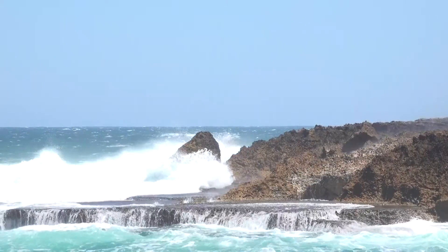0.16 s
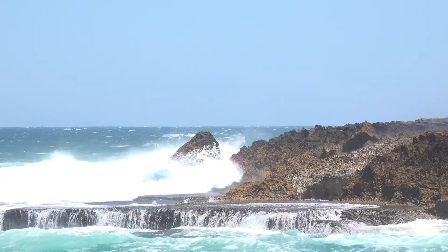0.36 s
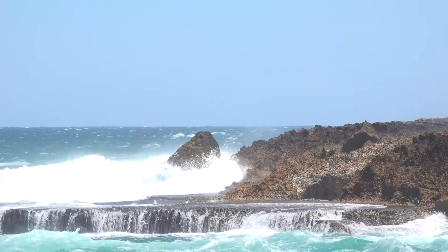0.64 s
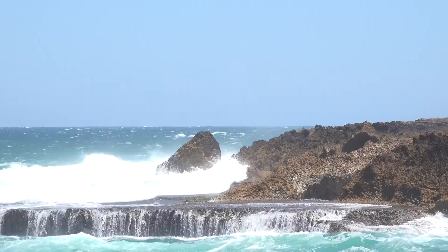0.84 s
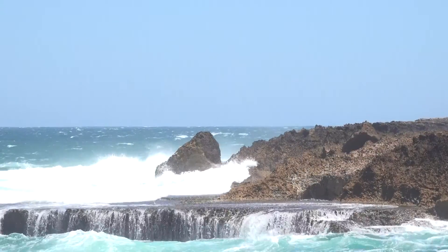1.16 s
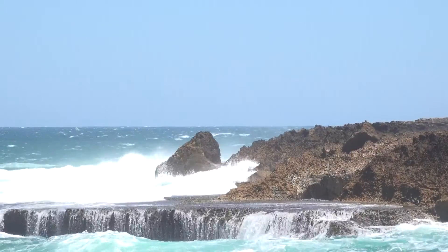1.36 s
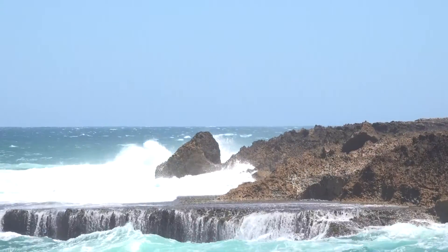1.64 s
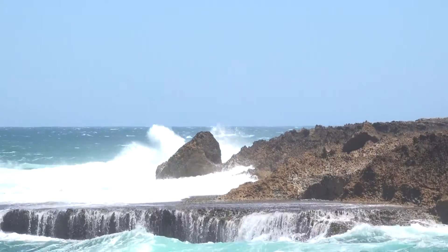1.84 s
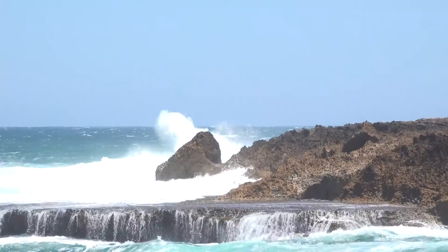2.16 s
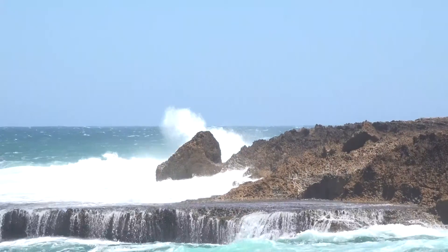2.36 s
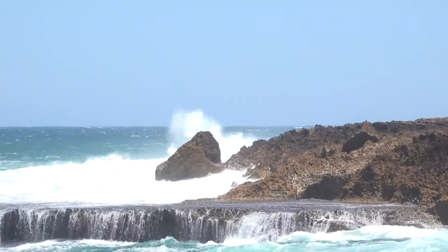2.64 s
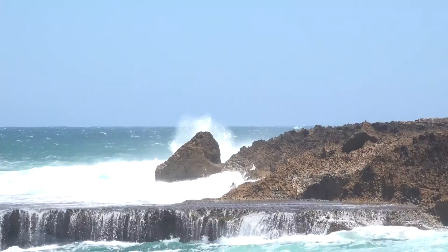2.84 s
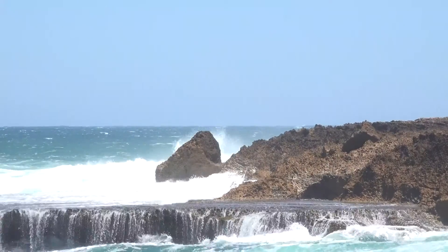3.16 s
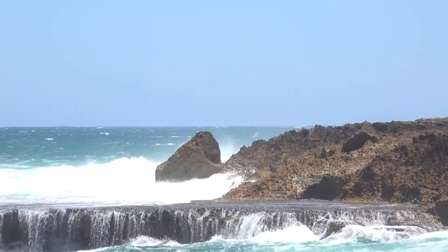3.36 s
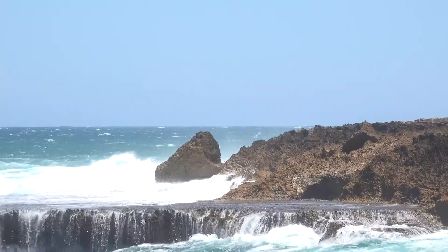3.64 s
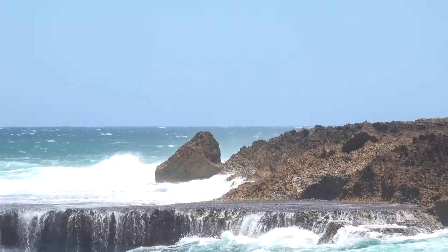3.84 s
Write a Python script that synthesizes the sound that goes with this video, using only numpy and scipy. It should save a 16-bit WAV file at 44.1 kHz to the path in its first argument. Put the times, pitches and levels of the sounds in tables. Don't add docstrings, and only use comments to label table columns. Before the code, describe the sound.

Steady roar of breaking surf with foamy hiss, buffeted by low, thudding wind on the microphone

```python
import sys
import numpy as np
from scipy import signal
from scipy.fft import rfft, irfft
from scipy.io import wavfile
from scipy.ndimage import uniform_filter1d, minimum_filter1d

SR = 44100
rng = np.random.default_rng(int(sys.argv[2]) if len(sys.argv) > 2 else 0)


def field_ratio(decibels):
    return 10 ** (np.asarray(decibels, dtype=float) / 20)


def output_pcm(signal):
    pcm = np.clip(np.atleast_2d(signal).T, -1, 1) * 32767
    wavfile.write(sys.argv[1], SR, np.round(pcm).astype(np.int16))


N = 176400

# time in seconds, level in dB, brightness in dB per octave.
SURF_SWELL = [(0, -38.5, -0.5), (.2, -39, -2), (.45, -39, 0), (.7, -40.5, -1), (.93, -41, -1),
              (1.2, -40.5, -1), (1.5, -40.5, -1.5), (1.75, -42.5, -1), (2.0, -45.5, -.5), (2.2, -43, -.5),
              (2.38, -42, -1.5), (2.6, -44, -1), (2.9, -42.5, -1), (3.1, -41.5, -1.5), (3.3, -43, -1.5),
              (3.45, -42.5, -1.5), (3.7, -43, -2), (4, -43, -1)]
# frequency in Hz, density in dB per Hz.
SURF_SPECTRUM = [(25, 0.5), (70, -0.5), (300, -4), (900, -11), (2000, -13.5), (5200, -21), (9300, -37.5),
                 (14000, -40.5)]
# frequency in Hz, left minus right in dB.
SURF_BALANCE = [(60, 2), (200, 6), (600, 9.5), (1300, 7), (2500, 4.5), (5000, 4.5), (7400, -0.5),
                (13600, 3)]
# frequency in Hz, likeness from 0 to 1.
SURF_LIKENESS = [(60, 1), (600, 1), (2900, 0.99), (5600, 1), (6000, .5), (9000, 0.43), (12000, 0.46),
                 (14000, 0.75)]
# frequency in Hz, lead of the left port in radians.
PORT_LEAD = [(5600, 0), (5900, 1.0), (7200, 1.8), (8600, 3.1), (9700, 4.1), (11100, 4.6), (12400, 5.9),
             (13800, 6.3)]
# centre in Hz, width in Hz, lift in dB.
PORT_RESONANCES = [
    (1900, 300, 0.5),
    (2650, 830, -2.5),
    (6840, 1500, -1),
    (8060, 1140, 3.5),
]
# middle in seconds, length in seconds, lift in dB.
SPRAY_BURSTS = [
    (0.087, 0.12, 3),
    (.235, 0.078, 7),
    (0.526, .12, 2),
    (.7, 0.26, 5),
    (1.38, 0.23, 3),
    (1.55, .08, 2.5),
    (2.33, .06, 2),
    (3.056, .06, 2),
    (3.38, .06, 2.5),
]
# time in seconds, peak in dB.
BODY_TICKS = [
    (.055, -44),
    (.49, -45),
    (1.545, -40),
    (2.10, -49),
    (2.43, -49),
    (3.06, -46),
]
# start in seconds, length in seconds, strength in dB, eddy size as Hz.
WIND_PUFFS = [(.14, 0.075, -30.5, 70.5), (0.221, 0.077, -16.5, 53), (0.332, .12, -21.5, 58),
              (.44, .10, -31.5, 45), (0.582, 0.057, -23.5, 65), (0.638, 0.097, -22.5, 58),
              (0.769, 0.085, -25.5, 61), (0.856, 0.025, -20.5, 60.6), (1.249, 0.047, -35.5, 80),
              (1.311, 0.11, -34, 75.6), (1.441, .11, -20.5, 55.4), (1.539, 0.11, -22, 86),
              (1.66, 0.12, -15.5, 65), (1.804, .09, -18.5, 76), (1.889, 0.069, -23, 82),
              (1.988, .21, -33.5, 45), (2.303, 0.12, -18.5, 89), (2.417, 0.16, -20.5, 73),
              (2.558, 0.075, -27.5, 69), (2.659, 0.15, -24.5, 61.6), (2.847, 0.11, -25, 55.6),
              (3.04, .09, -20.5, 61), (3.119, 0.16, -19.5, 92.5), (3.297, 0.095, -27, 94),
              (3.38, 0.097, -19, 49), (3.459, 0.072, -18.5, 70), (3.542, 0.099, -28.5, 55.7),
              (3.701, 0.13, -23.5, 99), (3.839, 0.13, -24, 69), (3.95, .08, -26.5, 99)]
# time in seconds, peak in dB, size as Hz.
EDDY_SLAPS = [(.283, -9.5, 131), (0.353, -13, 71), (0.669, -10, 68), (.73, -19.5, 91), (0.884, -16, 70.4),
              (1.272, -20, 94), (1.385, -19, 122), (1.58, -12.5, 118), (1.685, -18.5, 297),
              (1.713, -13, 49.5), (1.82, -17, 128), (1.945, -10.5, 105), (2.266, -23, 55),
              (2.387, -13.5, 169), (2.537, -11.5, 108), (2.809, -20, 90), (2.875, -15, 60),
              (3.192, -12, 116), (3.269, -15, 140), (3.377, -15, 196), (3.403, -11, 54.7), (3.517, -8, 91),
              (3.818, -11, 116), (3.997, -12, 129)]
# frequency in Hz, left minus right in dB.
WIND_BALANCE = [(25, 8), (55, 0.5), (125, 9.5), (300, 17), (1000, 6)]
# frequency in Hz, likeness from 0 to 1.
WIND_LIKENESS = [(40, .998), (80, 1), (140, 0.82), (300, 1)]
# time in seconds, depth in dB.
GAIN_DUCKS = [
    (.285, 2),
    (.885, 0.5),
    (1.70, 4),
    (1.95, -0.5),
    (3.52, 3),
]


def evened(x):
    return x / np.sqrt(np.mean(x ** 2) + 1e-20)


def read(points, hz):
    f, value = np.transpose(points)
    return np.interp(np.log(hz + 1), np.log(f + 1), value)


def ports(sound, twin, balance, likeness):
    hz = np.fft.rfftfreq(N, 1 / SR)
    shared = np.clip(read(likeness, hz), 0, 1)
    right_gain = field_ratio(-read(balance, hz))
    turn = np.exp(-1j * read(PORT_LEAD, hz))
    left = rfft(sound)
    right = right_gain * (shared * turn * left + np.sqrt(1 - shared ** 2) * rfft(twin))
    mid = 0.5 * np.sqrt(abs(1 + right_gain * shared * turn) ** 2 + right_gain ** 2 * (1 - shared ** 2))
    return irfft(np.array([left, right]) / mid, N)


def foam():
    pitches, grains_per_s, spread_db = 24, 3000, 4
    t = np.arange(400) / SR
    out = np.zeros(N)
    for hz in np.geomspace(300, 13000, num=pitches):
        size = field_ratio(spread_db * np.minimum(rng.exponential(1, N), 5))
        bursts = size * (rng.random(N) < grains_per_s / pitches / SR)
        ring = np.sin(2 * np.pi * hz * t * (1 + 8 * t))
        grain = ring * t * hz * np.exp(-t * hz / 1.6)
        out += evened(signal.oaconvolve(bursts, grain)[:N]) * np.sqrt(hz)
    return evened(out)


def breakers():
    foam_db, roar_db, patch_db, flicker_db, spray_from_hz = -11, -1, 0.97, 0.23, 5200
    raw = rng.standard_normal(N) + field_ratio(foam_db) * foam()
    hz, t, z = signal.stft(raw, SR, nperseg=1024, noverlap=768)
    column = hz[:, None]
    patches = uniform_filter1d(rng.standard_normal(z.shape), size=14, axis=0)
    patches = evened(uniform_filter1d(patches, size=12, axis=1))
    flicker = evened(uniform_filter1d(rng.standard_normal(len(t)), size=4))

    s, level, bright = np.transpose(SURF_SWELL)
    db = read(SURF_SPECTRUM, hz)[:, None] + np.interp(t, s, bright) * np.log2((column + 50) / 2000)
    db += patch_db * patches + flicker_db * flicker
    for mid_hz, width_hz, lift_db in PORT_RESONANCES:
        db += lift_db * np.exp(-((column - mid_hz) / width_hz) ** 2)
    spray_db = sum(lift * np.exp(-(2 * (t - at) / length) ** 2) for at, length, lift in SPRAY_BURSTS)
    db += spray_db / (1 + (spray_from_hz / (column + 1)) ** 2.8)

    band = (hz > 700) & (hz < 5000)
    unit = np.sqrt(np.sum(field_ratio(2 * read(SURF_SPECTRUM, hz[band]))) / len(hz))
    gain = field_ratio(db + np.interp(t, s, level) + roar_db) / unit
    return signal.istft(z * gain, nperseg=1024, noverlap=768)[1][:N]


def ticks():
    ring_hz, t60_s = 10500, 0.006
    t = np.arange(600) / SR
    out = np.zeros(N)
    ring = np.sin(2 * np.pi * ring_hz * t) + 0.7 * np.sin(2 * np.pi * 0.79 * ring_hz * t)
    for s, db in BODY_TICKS:
        out[round(s * SR):][:len(t)] += field_ratio(db - 60 * t / t60_s) * ring
    return out * np.array([[1], [-0.3]])


def puff(start, length, db, eddy_hz):
    edge_s, eddies_per_s, spread_db, eddy_width = 0.025, 450, 2.0, 0.96
    rush_db, rush_hz, rush_tilt, port_cut_hz, steadiness = -21, 204, 2.11, 20.7, 0.4
    t = np.arange(SR // 3) / SR
    push = field_ratio(spread_db * rng.exponential(1, len(t))) * rng.standard_normal(len(t))
    push *= rng.random(len(t)) < eddies_per_s / SR
    to_edge = np.minimum(t, length - t + edge_s)
    shape = np.sin(np.pi / 2 * np.clip(to_edge / edge_s, 0, 1))

    f = np.fft.rfftfreq(len(t), 1 / SR) + 0.1
    body = 1 / (1 + 1j * (f / eddy_hz - eddy_hz / f) / eddy_width)
    body = body / (1 + 1j * f / (1.25 * eddy_hz)) ** 2
    rush = field_ratio(rush_db) * (eddy_hz / 70) ** 2 / (1 + 1j * f / rush_hz) ** rush_tilt
    cut = (1j * f / (port_cut_hz + 1j * f)) ** 3.2
    x = evened(irfft(rfft(push) * (body + rush) * cut, len(t)))

    local = uniform_filter1d(uniform_filter1d(x ** 2, size=900), size=600)
    x *= shape / (abs(local) + 0.05) ** (0.5 * steadiness)
    return field_ratio(db) * x / np.sqrt(np.sum(x ** 2) / (length * SR) + 1e-20)


def wind():
    out = np.zeros(N + SR)
    for row in WIND_PUFFS:
        at = round(row[0] * SR)
        out[at:at + SR // 3] += puff(*row)
    return out[:N]


def slaps():
    decay_cycles = 0.5
    t = np.arange(-1000, 1000) / SR
    out = np.zeros(N + SR)
    for s, db, hz in EDDY_SLAPS:
        u = t * hz
        swing = np.sin(2 * np.pi * u * (1 - 0.33 * np.tanh(u))) * np.exp(-abs(u / decay_cycles) ** 0.89)
        swing = swing - swing.mean() * 2 * np.hanning(len(t))
        out[round(s * SR) - 1000:][:len(t)] += field_ratio(db + 1) * swing
    return out[:N]


def scene():
    surf = ports(breakers(), breakers(), SURF_BALANCE, SURF_LIKENESS)
    gusts = ports(wind() + slaps(), wind(), WIND_BALANCE, WIND_LIKENESS)
    return surf + ticks() + gusts


def band_limit(x):
    return signal.sosfilt(signal.butter(12, 14180, fs=SR, output="sos"), x)


def record(dry):
    recover_s, limit = 0.047, 0.55
    t = np.arange(N) / SR
    down_db = sum(db * (t > s) * np.exp(-np.maximum(t - s, 0) / recover_s) for s, db in GAIN_DUCKS)
    ducked = dry * field_ratio(-uniform_filter1d(down_db, size=700))
    peak = uniform_filter1d(-minimum_filter1d(-abs(ducked).max(0), size=400), size=400)
    return band_limit(ducked / np.maximum(peak / limit, 1))


dry = scene()
out = record(dry)
output_pcm(out)
```